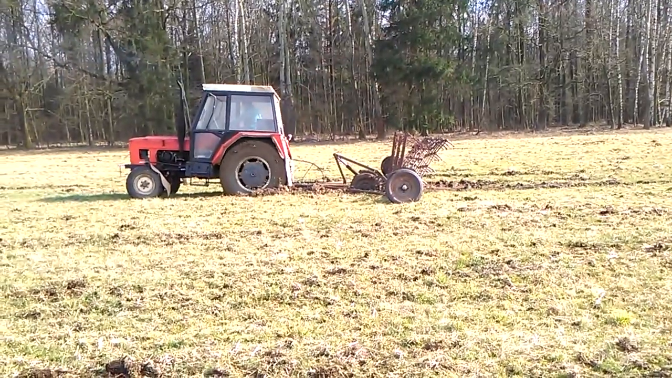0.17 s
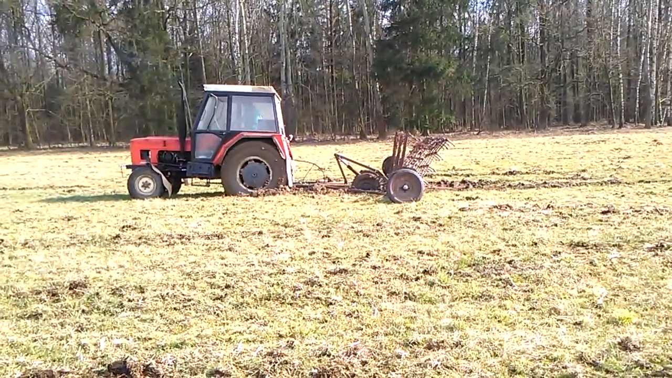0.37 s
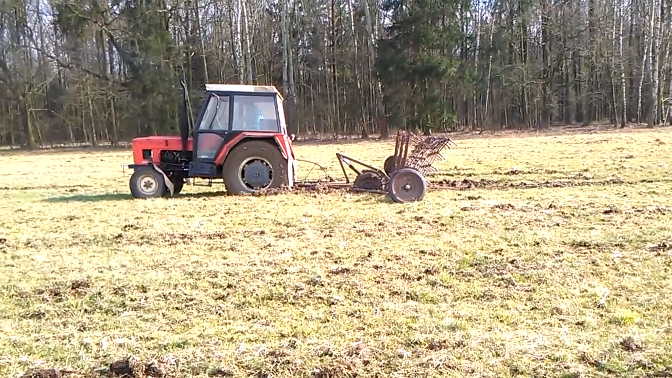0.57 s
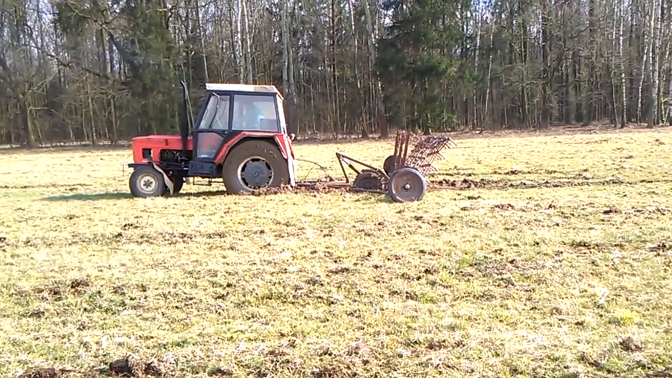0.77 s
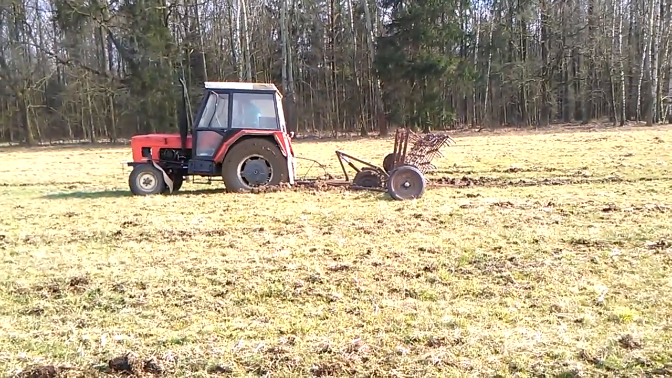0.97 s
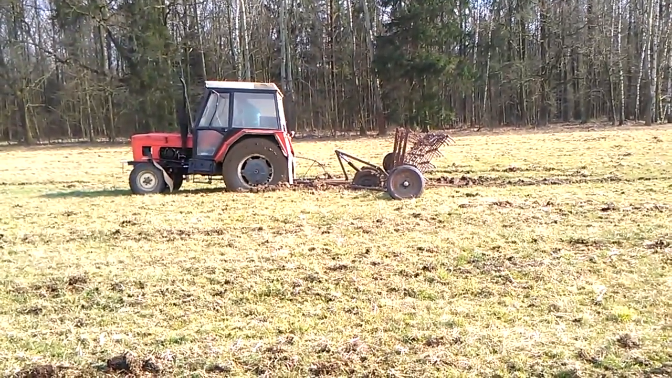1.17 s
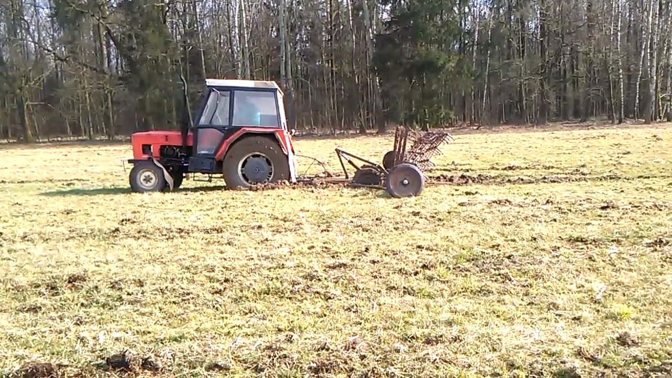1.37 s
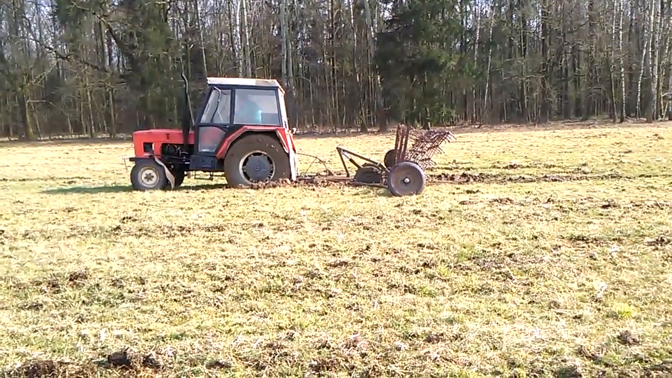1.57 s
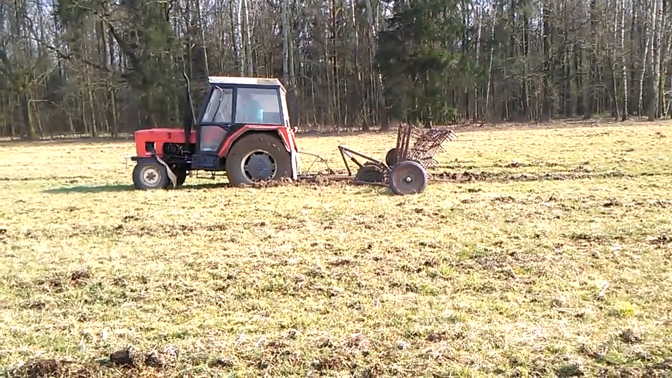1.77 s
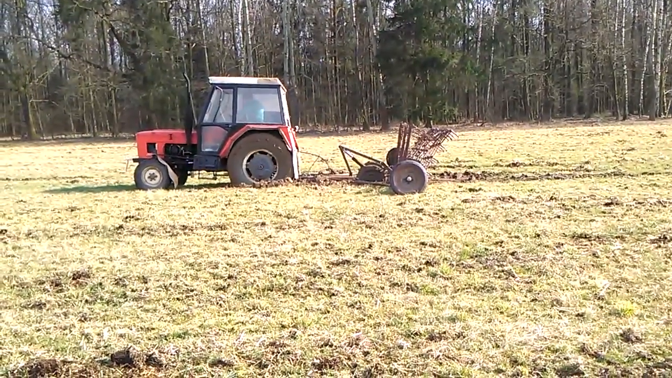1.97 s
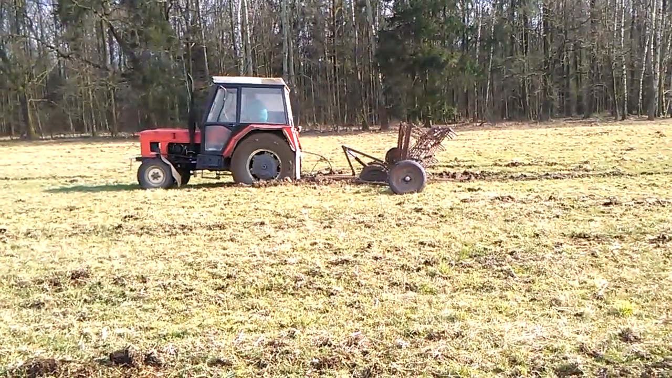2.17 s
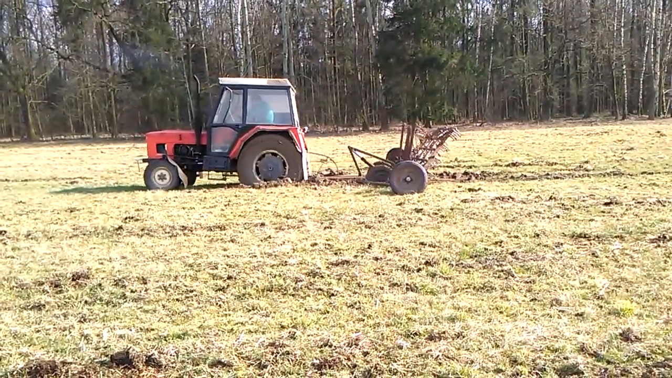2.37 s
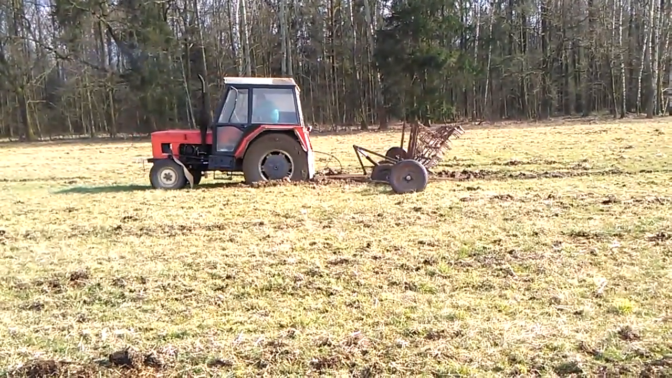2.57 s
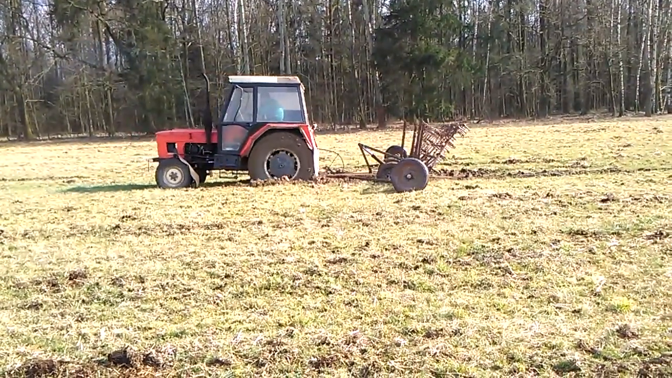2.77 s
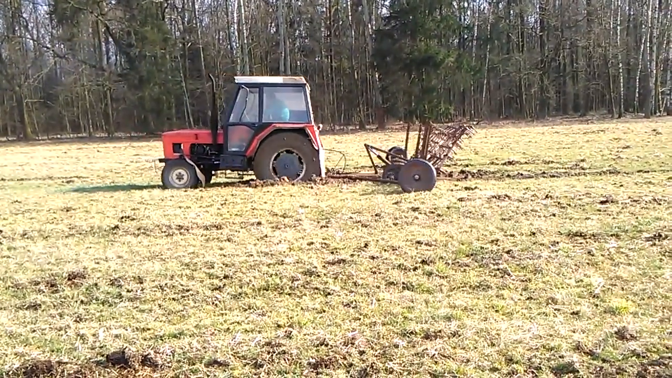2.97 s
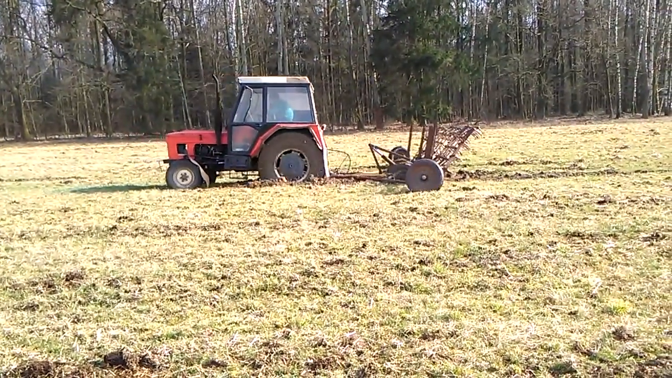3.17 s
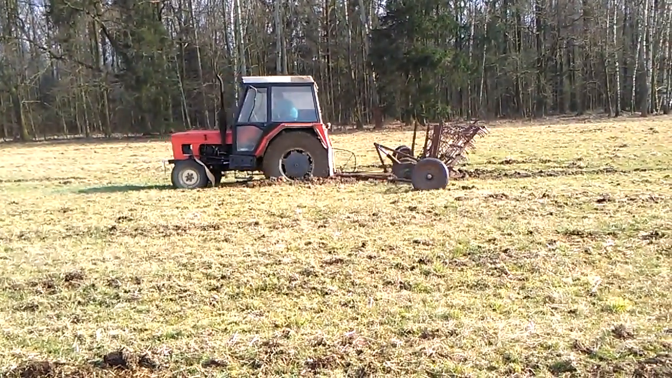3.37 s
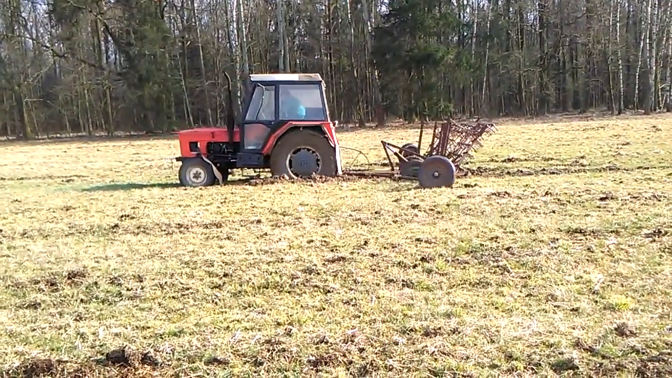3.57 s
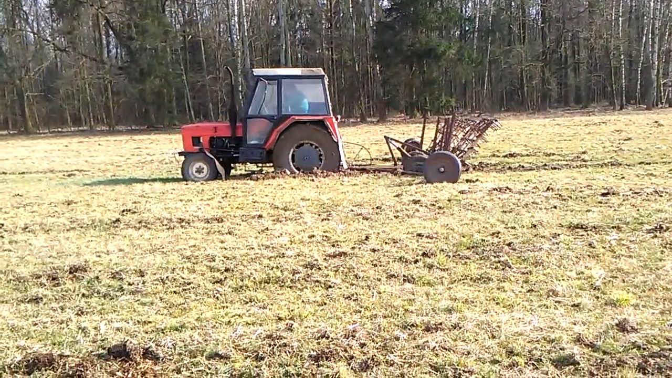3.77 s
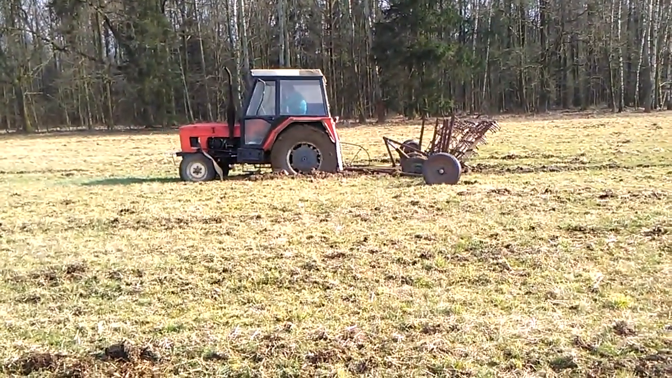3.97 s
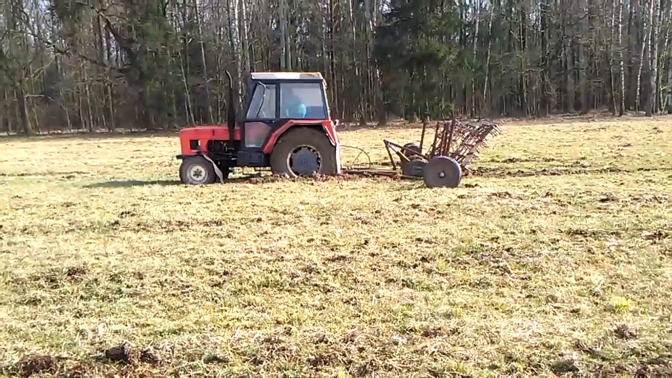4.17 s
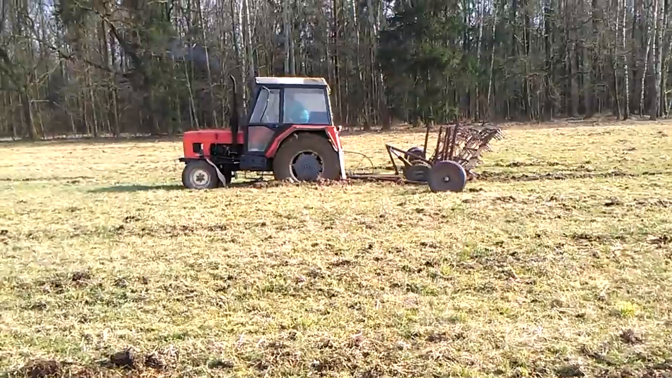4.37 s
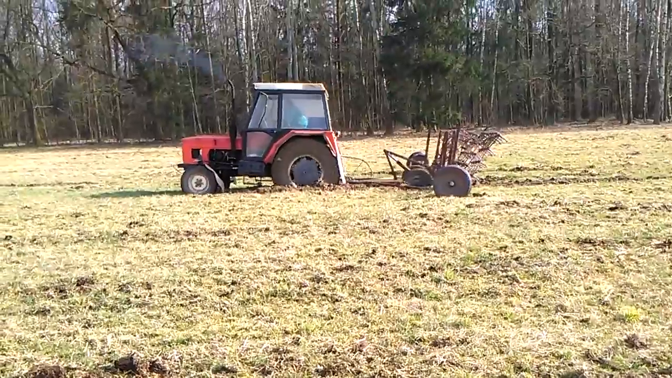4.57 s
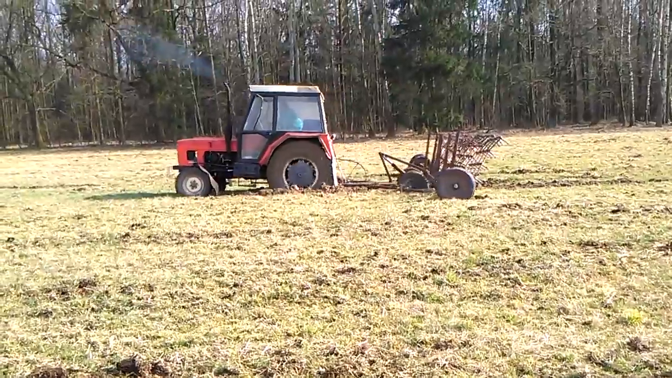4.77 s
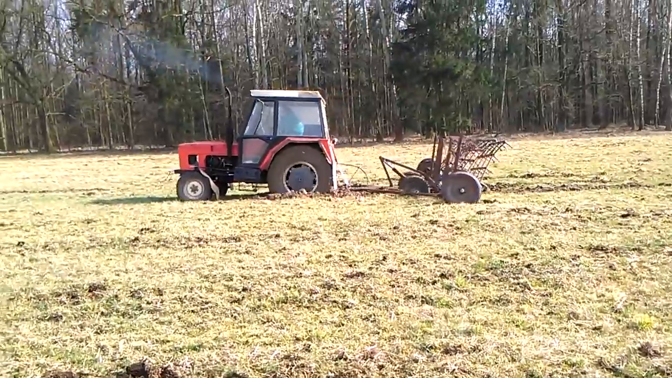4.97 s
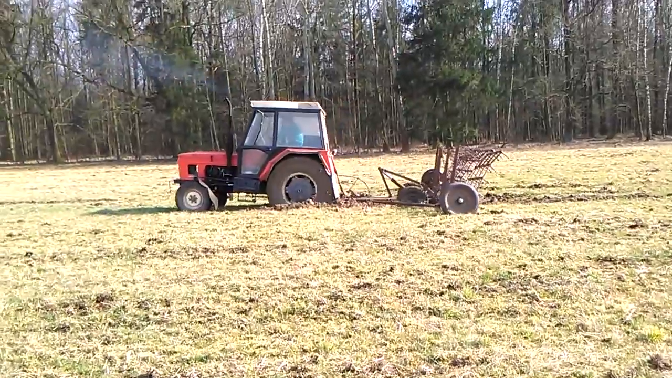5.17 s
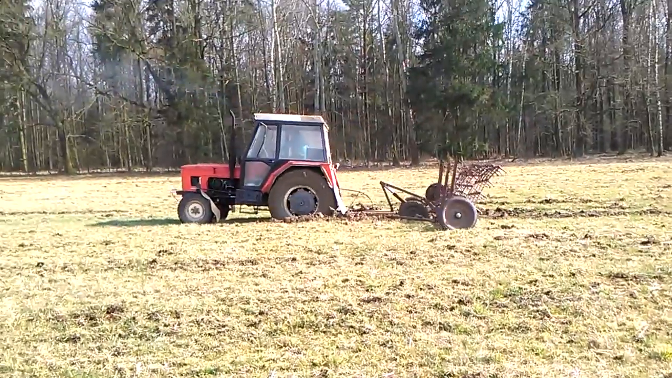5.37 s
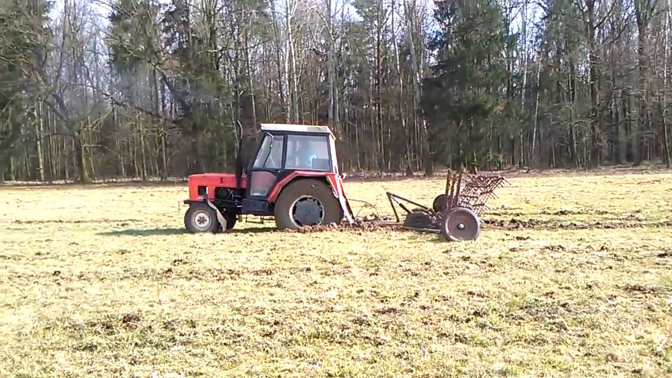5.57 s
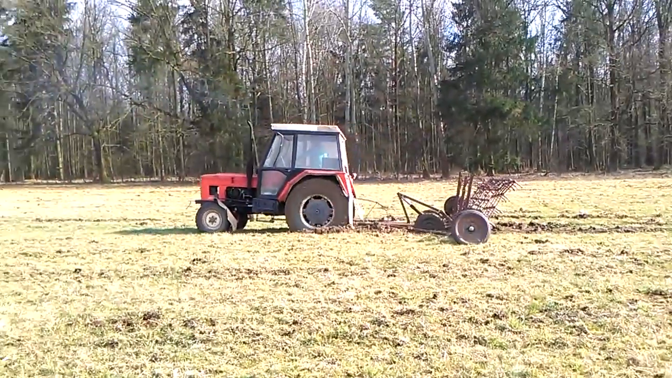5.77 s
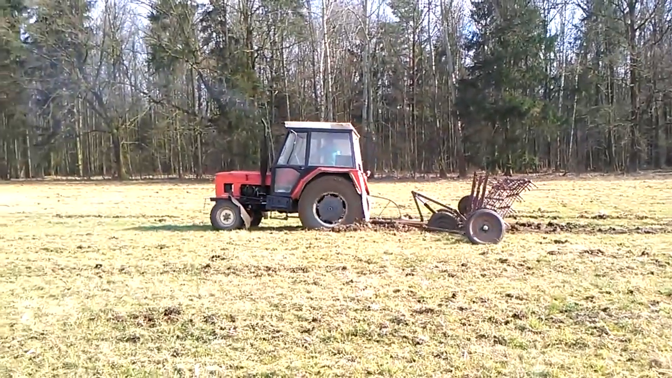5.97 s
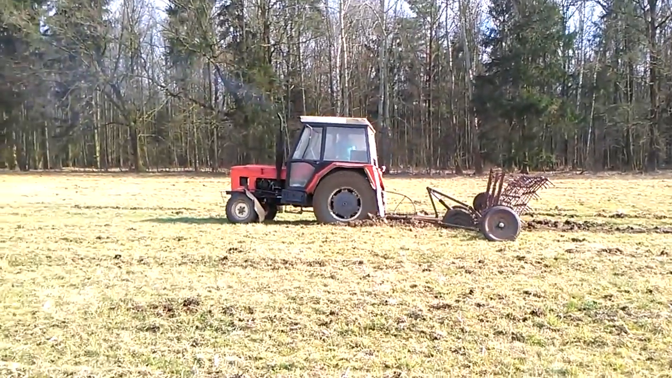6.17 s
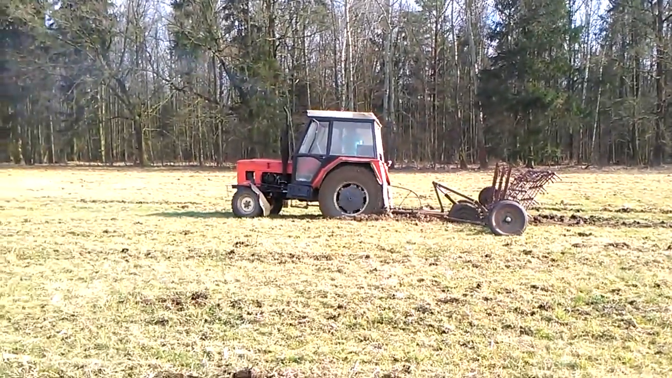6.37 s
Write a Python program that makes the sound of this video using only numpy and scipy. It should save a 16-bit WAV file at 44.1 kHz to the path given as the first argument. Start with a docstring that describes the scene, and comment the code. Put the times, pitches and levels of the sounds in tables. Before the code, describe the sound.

A diesel tractor labours in an open field, already loud at 0 s: a dense low drone of about 68 firings per second, with raspy pipe ring, clatter, pulsing exhaust hiss and scattered ticks. The boom overloads the microphone, sounding flattened and buzzing. At 1.0 s the fuel is cut; the engine drops in level, sinks in pitch, and hum, fan hiss and wind thumps show through until it returns at 1.76 s with bright rattles. From 2 to 3.5 s it pulls steadily, recovering its pitch after a small dip. At 3.5 s a second cut sags deeper, to about 58 firings per second, until a hissing bark at 4.2 s restores full power. The pitch then climbs to about 70 by 6.4 s, while strong wind thumps, mostly left, buffet from 4.5 to 5.4 s. The drone continues to the end.

```python
"""In a muddy field a four-cylinder diesel tractor strains; twice its fuel is cut back for most of a second and it sags.
The exhaust boom is one pressure swing per firing; pipe rasp is ringing filters, hiss and wind are coloured noise.
Under load the boom overloads the microphone amplifier, so hiss and clatter pass mainly between its flat tops.
The left port hears the tractor 0.3 ms later, the right has a strong treble resonance; wind buffets both."""
import sys
import numpy as np
from scipy import signal
from scipy.fft import rfft, irfft
from scipy.io import wavfile

SR = 44100
rng = np.random.default_rng(int(sys.argv[2]) if len(sys.argv) > 2 else 0)


def bounce(signal):
    """Save signal as a 16-bit WAV file at the path given by the first command-line argument."""
    frames = np.transpose(np.atleast_2d(signal))
    limited = np.clip(frames, -1, 1)
    pcm = np.round(limited * 32767).astype(np.int16)
    wavfile.write(sys.argv[1], SR, pcm)


N = 283122

FREE_HZ = 66.8   # free firing rate, firings per s
LEFT_LAG_S = 0.0003   # the left port hears the tractor this much later
HOLLOW_HZ = 560   # pipe rasp and hiss fade out below this


def from_db(db):
    """Decibels as an amplitude gain."""
    return 10 ** (np.asarray(db) / 20)


def rms_one(x):
    """Scale a signal to an rms of 1."""
    return x / np.sqrt(np.mean(x ** 2) + 1e-20)


def times():
    """Time of every sample in seconds."""
    return np.arange(N) / SR


def in_time(rows):
    """Columns of a curve table, one value per sample."""
    s, *columns = np.transpose(rows)
    return [np.interp(times(), s, column) for column in columns]


def at_hz(points):
    """A spectrum table read on the FFT grid, straight between points in log frequency."""
    hz = np.maximum(np.fft.rfftfreq(N, 1 / SR), 1)
    point_hz, values = np.transpose(points)
    return np.interp(np.log(hz), np.log(point_hz), values)


def shaped(x, gain):
    """Colour a signal by a gain for each frequency."""
    return irfft(rfft(x) * gain, N)


def filtered(x, order, hz, kind):
    """Butterworth filter."""
    return signal.sosfilt(signal.butter(order, hz, kind, fs=SR, output="sos"), x)


def ring_poles(r, hz):
    """Filter denominator that rings at hz and shrinks by r each sample."""
    return [1, -2 * r * np.cos(2 * np.pi * hz / SR), r * r]


def decaying(clicks, decay_s):
    """Envelope that jumps at each click and dies exponentially."""
    return signal.lfilter([1], [1, -np.exp(-1 / (decay_s * SR))], clicks + 1e-18)


def clicks_at(rows, gain_db):
    """Single-sample clicks from a table of times and levels."""
    s, peak_db = np.transpose(rows)
    clicks = np.zeros(N)
    clicks[(s * SR).astype(int)] = from_db(peak_db + gain_db)
    return clicks


def drift(rate_hz):
    """Slow chance of spread 1."""
    r = np.exp(-2 * np.pi * rate_hz / SR)
    return rms_one(signal.lfilter([1], [1, -2 * r, r * r], rng.standard_normal(N + SR))[SR:])


def per_firing(firings, spread_db):
    """A gain that glides to a new random value at each firing."""
    return from_db(spread_db * np.interp(firings, np.arange(500), rng.standard_normal(500)))


def late(x, lag_s):
    """Delay a signal by a fraction of a second."""
    t = times()
    return np.interp(t - lag_s, t, x)


def leaning(db, lean_db):
    """Left and right gains around a level, set apart by the lean."""
    return from_db(db + lean_db * np.array([[.5], [-.5]]))


# Noise that both ports of the microphone share. Each row: frequency in Hz, shared part 0-1 (held to 1).
SHARED_NOISE = [(300, 0.01), (1300, 1), (1900, 1), (3000, 0.42), (6000, 0.07)]


def at_ports(envelope, left_colour, right_colour):
    """Noise coloured for each port, partly common to both; the common part reaches the left port late."""
    common, left, right = rng.standard_normal((3, N)) * envelope
    alike = np.clip(at_hz(SHARED_NOISE), 0, 1)
    ports = []
    for shared, own, colour in [(late(common, LEFT_LAG_S), left, left_colour), (common, right, right_colour)]:
        gain = from_db(at_hz(colour))
        ports.append(shaped(shared, np.sqrt(alike) * gain) + shaped(own, np.sqrt(1 - alike) * gain))
    return rms_one(filtered(ports, 4, HOLLOW_HZ, "high"))


# Times when the fuel is cut back. Each row: start in seconds, end in seconds, throttle 0-1 just
# after the start, seconds held there, throttle 0-1 after the next drop, throttle 0-1 at the end,
# peak of the hiss burst as the fuel returns in dB.
FUEL_CUTS = [(1.0, 1.76, 0.68, 0.17, 0.5, 0.5, 0.5), (3.5, 4.213, 0.65, 0.059, 0.53, 0.44, 13.5)]
CUT_FALL_S, DROP_S = 0.057, 0.096   # time for the fuel to fall, and to drop again
PICK_UP_S, BARK_S = 0.013, 0.011   # time for the fuel to come back, and for the burst to peak


def fuel(load):
    """Throttle, share of cut 0-1 and hiss burst: the fuel drops fast, holds, drops and sags, then returns with a bark."""
    t, throttle, cut, bark_db = times(), load, 0, 0
    for start, end, first, held_s, then, last, db in FUEL_CUTS:
        share = np.interp(t, [start, start + CUT_FALL_S, end, end + PICK_UP_S], [0, 1, 1, 0])
        drop_at = start + held_s
        reduced = np.interp(t, [drop_at, drop_at + DROP_S, end], [first, then, last])
        throttle = throttle + share * (reduced - throttle)
        cut = cut + share
        since = np.maximum(t - end, 0) / BARK_S
        bark_db = bark_db + db * since * np.exp(1 - since)
    return throttle, cut, bark_db


# Exhaust strength of the four cylinders in firing order. Each entry: relative level in dB.
CYLINDER_BOOM_DB = [-4, -6, -3.5, -6.5]
BOOM_IDLE_DB, BOOM_LOAD_DB = -36.5, 5.5   # base level with no fuel and at full fuel


def boom(firings, throttle, second_db, skew_db):
    """One pressure swing per firing, quick to rise and slow to fall; the second multiple narrows the crest."""
    phase = 2 * np.pi * (firings + 0.014 * drift(27.0))
    skew = from_db(skew_db) * np.sin(2 * phase)
    shoulders = from_db(-14) * np.cos(3 * phase)   # a pipe overtone squares the swing
    pulse = np.cos(phase) - skew - shoulders + from_db(second_db) * np.cos(2 * phase)
    cylinder_db = np.interp(firings % 4, np.arange(5), CYLINDER_BOOM_DB + [CYLINDER_BOOM_DB[0]])
    level_db = BOOM_IDLE_DB + (BOOM_LOAD_DB - BOOM_IDLE_DB) * throttle + cylinder_db
    return from_db(level_db) * per_firing(firings, spread_db=0.5) * pulse


# Pumping hum, heard best with the fuel cut back. Each entry: multiple of the firing rate.
HUM_MULTIPLES = [2, 3, 3.75, 4.75]
# Strength of those multiples. Each entry: relative level in dB.
HUM_LEVELS_DB = [-27.5, -24.5, -28.5, -36]


def hum(firings):
    """Air pumped through the engine: multiples of the firing rate that waver in level and phase."""
    out = 0
    for multiple, db in zip(HUM_MULTIPLES, HUM_LEVELS_DB):
        level = from_db(db + 4 * drift(6.9)) * np.sqrt(2)
        out = out + level * np.cos(2 * np.pi * multiple * firings + 2 * np.pi * .05 * drift(12.5))
    return out


# Knock and gas noise of the four cylinders. Each entry: relative level in dB.
CYLINDER_CLATTER_DB = [2.2, -1, -2.5, 2.2]


def by_cylinder(firings):
    """Each cylinder clatters at its own strength."""
    return from_db(np.array(CYLINDER_CLATTER_DB)[firings.astype(int) % 4])


# Resonances of the exhaust pipe. Each row: frequency in Hz, width of one filter pass in Hz, relative level in dB.
PIPE_RESONANCES = [(637.6, 103, 13.5), (696, 256, 7), (767, 64, 3)]
KNOCK_AT, KNOCK_DB = .6, 24   # place in the firing cycle 0-1, and level over the gas noise


def rasp(firings):
    """Turbulent gas and a sharp knock at each firing ring the steep resonances of the exhaust pipe."""
    count = np.floor(firings - KNOCK_AT)
    knocks = from_db(KNOCK_DB) * np.diff(count, prepend=count[0]) * per_firing(firings, spread_db=2.5)
    gas = rng.standard_normal(N) * per_firing(firings, spread_db=2.16)
    blows = (gas + knocks) * by_cylinder(firings)
    out = 0
    for hz, width_hz, db in PIPE_RESONANCES:
        stage = [1, 0, -1] + ring_poles(np.exp(-np.pi * width_hz / SR), hz)
        out = out + from_db(db) * rms_one(signal.sosfilt([stage, stage], blows))   # two passes
    return rms_one(filtered(out, 4, HOLLOW_HZ, "high"))


# Hardest knocks in the exhaust pipe. Each row: start in seconds, relative level in dB.
HARDEST_KNOCKS = [(0.118, -12), (0.302, -20), (0.632, -10), (0.986, -11), (2.004, -33), (2.167, -8),
                  (2.43, -14), (2.974, -11), (4.237, -9), (4.672, -14), (4.766, -7.5), (5.089, -11),
                  (5.391, -15), (5.51, -12), (5.63, -13), (5.735, -14), (5.914, -16), (6.222, -7.5),
                  (6.265, -10)]
HARD_HZ, HARD_DECAY_S, HARD_DB = 710, 0.0047, 5   # ring, decay and gain


def hard_knocks():
    """The hardest blows ring the pipe wall at once and die in a few cycles."""
    r = np.exp(-1 / (HARD_DECAY_S * SR))
    strike = [0, np.sin(2 * np.pi * HARD_HZ / SR)]
    return signal.lfilter(strike, ring_poles(r, HARD_HZ), clicks_at(HARDEST_KNOCKS, HARD_DB) + 1e-18)


# Steady fan and valve gear at the left port. Each row: frequency in Hz, relative level in dB per Hz.
FAN_LEFT = [(520, -10), (720, -0.5), (900, -6), (1600, -17), (2150, -13), (2450, -14), (2850, -15),
            (3300, -22.5), (3550, -18), (4000, -28), (5200, -29), (7000, -34), (9500, -26), (15000, -30)]
# The same at the right port. Each row: frequency in Hz, relative level in dB per Hz.
FAN_RIGHT = [(520, -7), (720, -0.5), (900, -8), (1600, -18.5), (2150, -10), (2450, -22), (2850, -10.5),
             (3300, -22), (3550, -16.5), (4000, -19.5), (5000, -21), (6800, -18), (7900, -2), (9000, -9),
             (11000, -18), (15000, -11.5)]
# Exhaust jet at the left port, also the colour of rattles and ticks. Each row: frequency in Hz, relative dB per Hz.
JET_AT_LEFT = [(500, -28), (900, -9), (1500, -14.5), (2500, -18.5), (3300, -18.5), (4300, -13), (5200, -24),
               (9500, -27), (15000, -46)]
# The same at the right port. Each row: frequency in Hz, relative level in dB per Hz.
JET_AT_RIGHT = [(500, -16.5), (1200, -20), (1600, -19), (2200, -11.5), (2900, -13.5), (3400, -15.5),
                (5500, -9.5), (6800, -8.5), (7900, 2.4), (9000, -4), (11000, -10), (15000, -20.5)]
# One puff of the jet. Each row: share of the firing cycle 0-1, relative level in dB.
JET_PUFF = [(0, 0), (.1, 16), (.5, 11), (.65, 3), (1, 0)]
PUFF_AT, PUFF_LATER_PER_HZ = .25, .022   # place in the firing cycle 0-1; the puff comes later at low speed
JET_CUT_DB = 3   # softens the jet's steep fall with the throttle during a cut


def hiss(firings, speed_hz, throttle, cut):
    """Fan and valve gear run on; the exhaust jet needs fuel and puffs sharply once per firing, then fades."""
    since = (firings - PUFF_AT - PUFF_LATER_PER_HZ * (FREE_HZ - speed_hz)) % 1
    swell_db = np.interp(since, *np.transpose(JET_PUFF))
    flutter_db = 0.9 * drift(130) + 2.75 * drift(720) + 2.0 * drift(2.4)
    puffs = from_db(swell_db + flutter_db) * per_firing(firings, spread_db=1.5)
    jet_db = 57.0 * (throttle - 1) + 8.0 + JET_CUT_DB * cut
    jet = from_db(jet_db) * at_ports(puffs, JET_AT_LEFT, JET_AT_RIGHT)
    steady = at_ports(from_db(1.34 * drift(24)), FAN_LEFT, FAN_RIGHT)
    return jet + from_db(2.5 * throttle) * steady


# Bright rattles heard at both ports. Each row: start in seconds, relative level in dB.
BRIGHT_RATTLES = [(0.303, -14), (0.3326, -18), (0.4349, -11), (0.509, -8), (0.7893, -5), (1.781, -6),
                  (1.862, -2.5), (1.921, -5), (2.168, -4), (2.3511, -14), (2.43, -9), (2.7053, -22),
                  (4.2197, -6), (4.401, -3), (4.6558, -17), (4.72, -10), (5.0095, -15), (5.0704, -12),
                  (5.1751, -13), (5.4151, -11), (5.51, -16), (5.63, -4), (5.851, -22), (6.221, 0)]
RATTLE_DECAY_S, RATTLE_GAIN_DB = 0.0032, -5


def rattles():
    """Short bright bursts of noise that start at once and die in a few milliseconds."""
    bursts = decaying(clicks_at(BRIGHT_RATTLES, RATTLE_GAIN_DB), RATTLE_DECAY_S)
    return np.sqrt(np.mean(bursts ** 2)) * at_ports(bursts, JET_AT_LEFT, JET_AT_RIGHT)


TICKS_PER_S = 160   # at full fuel
TICK_DB, TICK_SPREAD_DB, TICK_DECAY_S = -33.5, 7, 0.001   # rms level, unevenness, decay


def ticks(throttle, cut):
    """Short bright ticks at chance moments, a few much stronger; they stop with the fuel cut."""
    born = rng.random(N) < TICKS_PER_S * throttle * (1 - cut) / SR
    clicks = born * from_db(TICK_SPREAD_DB * np.minimum(rng.exponential(1, N), 4))
    return from_db(TICK_DB) * at_ports(decaying(clicks, TICK_DECAY_S), JET_AT_LEFT, JET_AT_RIGHT)


# Wind gusts at the microphone ports. Each row: centre in seconds, half length in seconds, relative buffeting
# in dB, relative rumble in dB, left over right in dB (held to 14 either way).
WIND_GUSTS = [(0.095, 0.091, -31, -16.5, 4), (0.49, 0.031, -44, -34, -8), (0.711, 0.046, -26.5, -33, 6),
              (1.052, 0.036, -38, -39, 11), (1.22, 0.018, -29, -23, -2), (1.442, 0.03, -32, -22, -4),
              (1.653, 0.0093, -28, -23, 19), (1.73, 0.06, -36.5, -30, 15), (1.895, 0.015, -24, -17.5, 15),
              (2.267, 0.15, -42, -21, -7), (3.628, 0.11, -51, -16, 3), (3.945, 0.0096, -24, -7, 15),
              (4.058, 0.062, -66, -25, 7), (4.26, 0.039, -25, -28, -9), (4.568, 0.034, -17.5, -31, 8),
              (4.72, 0.03, -17.5, -17.5, 15), (4.861, 0.044, -16.5, -22, 14), (4.973, 0.08, -17, -28, 13.5),
              (5.155, 0.058, -21, -23, 11), (5.294, 0.071, -18.5, -18.5, 16), (5.463, 0.066, -27, -29, -7),
              (5.85, 0.046, -47, -33, -2), (6.337, 0.49, -36.5, -22, 7.5)]


def gusting(calm_db, gust_db):
    """Gain at each port: a wandering calm level plus one bell-shaped swell per gust."""
    t = times()
    out = from_db(calm_db + 2.04 * np.array([drift(0.69), drift(5.6)]))
    for (s, half_s, *_, lean_db), db in zip(WIND_GUSTS, gust_db):
        out = out + leaning(db, np.clip(lean_db, -14, 14)) * np.exp(-((t - s) / half_s) ** 2)
    return out


# Wind buffeting the ports. Each row: frequency in Hz, relative level in dB per Hz.
BUFFET_COLOUR = [(20, -20), (50, 3.5), (100, 13), (200, 5), (330, -5), (480, -38), (800, -50)]
BREEZE_DB = -36.5   # relative level between the gusts


def buffeting():
    """Lumpy low noise, partly its own at each port."""
    common, left, right = rng.standard_normal((3, N))
    lumps = [from_db(1.2 * drift(40)) * (0.41 * common + own) for own in (left, right)]
    noise = rms_one(shaped(np.array(lumps), from_db(at_hz(BUFFET_COLOUR))))
    return gusting(BREEZE_DB, np.transpose(WIND_GUSTS)[2]) * noise


# Low thumps as the wind slaps the ports. Each row: centre in seconds, pitch in Hz, peak in dB before
# the amplifier, left over right in dB.
WIND_THUMPS = [(1.101, 268, -15, 3), (1.212, 151, -14, -7), (1.439, 288, -23, 6), (1.649, 308, -14, 15),
               (1.662, 74.4, -17, 19), (1.70, 231, -15, 10), (1.713, 112, -12.5, 9), (1.74, 194, -14, 8),
               (1.899, 128, -16, 1), (3.946, 198, -14.5, 22), (3.956, 400, -21, 14), (4.011, 370, -21, 11),
               (4.141, 285, -20, 3), (4.57, 124, -10, 1), (4.87, 120, -5, 8), (4.971, 135, -7, -1),
               (5.15, 320, -6.5, 14), (5.226, 273, -10, 5), (5.30, 500, -18, 8), (5.338, 150, -6, -1)]
THUMP_CYCLES = 1.44   # half length


def thumps():
    """Each slap is a few cycles of a low tone under a bell, at a chance phase."""
    t, out = times(), 0
    phases = rng.uniform(0, 2 * np.pi, len(WIND_THUMPS))
    for (s, hz, db, lean_db), phase in zip(WIND_THUMPS, phases):
        cycles = (t - s) * hz
        bell = np.exp(-(cycles / THUMP_CYCLES) ** 2)
        out = out + leaning(db, lean_db) * bell * np.cos(2 * np.pi * cycles + phase)
    return out


# Low drone behind everything. Each row: frequency in Hz, relative level in dB per Hz.
RUMBLE_COLOUR = [(90, -2), (150, 6), (240, 9.5), (330, 2), (400, -4), (450, -32.5)]
CALM_RUMBLE_DB = -24.5   # relative level between the gusts


def rumble():
    """A lumpy low drone that leans from port to port."""
    common, left, right = rng.standard_normal((3, N)) * from_db(2.1 * drift(12.0))
    lumps = np.array([common + .5 * left, common + .5 * right])
    noise = rms_one(shaped(lumps, from_db(at_hz(RUMBLE_COLOUR))))
    return gusting(CALM_RUMBLE_DB, np.transpose(WIND_GUSTS)[3]) * noise


# Engine speed throughout. Each row: time in seconds, firings per second.
ENGINE_SPEED = [(0.0, 69.29), (0.12, 68.59), (0.3, 68.02), (0.6, 67.76), (0.9, 67.73), (1.05, 67.39),
                (1.2, 67.23), (1.35, 64.27), (1.5, 62.21), (1.65, 60.74), (1.76, 60.6), (1.83, 61.34),
                (1.95, 65.12), (2.1, 66.06), (2.25, 64.6), (2.4, 67.23), (2.6, 68.38), (2.9, 67.7),
                (3.2, 67.75), (3.45, 67.39), (3.6, 64.28), (3.8, 62.59), (4.0, 59.5), (4.2, 58.47),
                (4.27, 59.69), (4.36, 62.86), (4.55, 63.18), (4.75, 63.38), (4.95, 64.95), (5.15, 66.52),
                (5.35, 66.48), (5.6, 66.91), (5.9, 66.83), (6.1, 68.34), (6.25, 69.94), (6.42, 69.94)]
# Engine load and hiss level through time; the hiss level also acts during the cuts.
# Each row: time in seconds, throttle 0-1, relative hiss level in dB.
ENGINE_LOAD = [(0, 0.87, -24.5), (.6, 0.94, -24), (1.0, 0.87, -25.5), (1.8, 0.85, -24), (2.3, 0.94, -21.5),
               (2.6, 0.84, -25.5), (3.2, 0.83, -24.5), (3.5, 0.84, -26.5), (3.95, 0.9, -25.5),
               (4.12, 0.9, -30.5), (4.3, 0.93, -24), (4.5, 0.95, -23.5), (5.0, 0.97, -24), (5.4, 0.88, -22),
               (6.0, 0.94, -24), (6.42, 0.91, -25)]
# The boom's second multiple grows as the engine is dragged down, up to a ceiling, and changes in a cut
SECOND_DB, SECOND_DB_PER_HZ, SECOND_TOP_DB, SECOND_CUT_DB = -18.5, 4, -11.5, -2
SKEW_DB, SKEW_DB_PER_HZ = -21, -2   # the slow fall of the swing steepens as the engine is dragged down
RASP_DB, RASP_DB_PER_HZ = -30, 0.37   # the rasp grows as the engine is dragged down
RASP_CUT_DB, HISS_CUT_DB = -14, -2   # change with the fuel cut
RASP_LAG_S = 0.015   # the pipe rasp returns a little after the fuel


def scene():
    """Fuel raises the boom and, with it, the rasp, hiss and ticks of the engine; the hum sinks."""
    speed_hz, = in_time(ENGINE_SPEED)
    firings = np.cumsum(speed_hz) / SR + 0.54
    load, hiss_db = in_time(ENGINE_LOAD)
    throttle, cut, bark_db = fuel(load)
    drag_hz = FREE_HZ - speed_hz

    second_db = np.minimum(SECOND_DB + SECOND_DB_PER_HZ * drag_hz, SECOND_TOP_DB) + SECOND_CUT_DB * cut
    low = boom(firings, throttle, second_db, SKEW_DB + SKEW_DB_PER_HZ * drag_hz)
    low = low + from_db(-6 * throttle) * hum(firings)

    rasp_db = RASP_DB + RASP_DB_PER_HZ * (drag_hz + 3.5) + 0.32 * bark_db + 8.8 * throttle
    rasp_db = rasp_db + RASP_CUT_DB * np.maximum(cut, late(cut, RASP_LAG_S))
    pipe = from_db(rasp_db) * rasp(firings) + hard_knocks()
    left = from_db(0.5) * late(low, LEFT_LAG_S) + from_db(-3.5) * late(pipe, .0001)
    right = low + from_db(5.0) * pipe

    air = from_db(hiss_db + HISS_CUT_DB * cut + bark_db + 2.5) * hiss(firings, speed_hz, throttle, cut)
    air = air + rattles() + ticks(throttle, cut)
    wind = from_db(3.5 + 4.95 * throttle) * buffeting() + thumps()
    drone = from_db(-10.5 + 8.0 * throttle) * rumble()
    return np.array([left, right]) + air + wind + drone


MID_LEAK_DB = -14.5   # the middle range that slips past the flats, on top of the treble
CASE_HZ, CASE_WIDTH_HZ, CASE_DB = 260, 77, -11.5   # low resonance of the recorder case
DIP_HZ, DIP_SHARE = (1000, 1810), 0.21   # a shallow cut between these frequencies
CUTOFF_HZ = 14800


def record(dry):
    """The amplifier flattens both swings as some treble leaks past; bass lift and case bend the flats; the top is cut."""
    top, bottom = .33, .31   # limits of the upward and downward swing
    knee, leak = 5, .2
    over = np.where(dry > 0, dry / top, -dry / bottom)
    treble = filtered(dry, 2, 1100, "high")
    middle = filtered(dry, 2, [1000, 3400], "band")
    flat = dry / (1 + over ** knee) ** (1 / knee) + leak * treble + from_db(MID_LEAK_DB) * middle
    r = np.exp(-2 * np.pi * 50 / SR)   # bass lift below 50 Hz
    lifted = flat + .6 * signal.lfilter([1 - r], [1, -r], flat)
    r = np.exp(-np.pi * CASE_WIDTH_HZ / SR)
    case = signal.lfilter([(1 - r * r) / 2, 0, (r * r - 1) / 2], ring_poles(r, CASE_HZ), flat)
    lifted = lifted + from_db(CASE_DB) * case
    lifted = lifted - DIP_SHARE * filtered(lifted, 1, DIP_HZ, "band")
    passed = filtered(lifted, 1, [3, 11000], "band")
    return signal.sosfilt(signal.cheby2(16, 60, CUTOFF_HZ, fs=SR, output="sos"), passed)


dry = scene()
out = record(dry)
bounce(out)
```